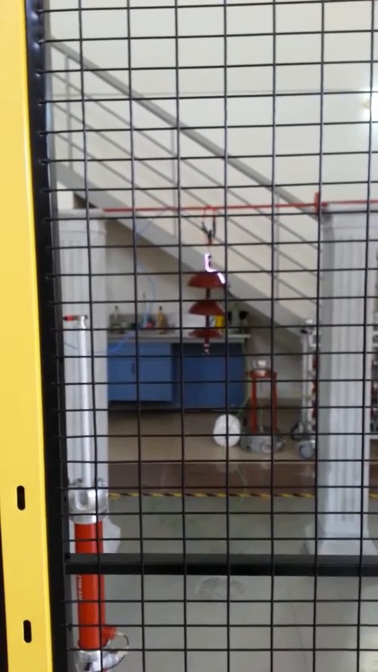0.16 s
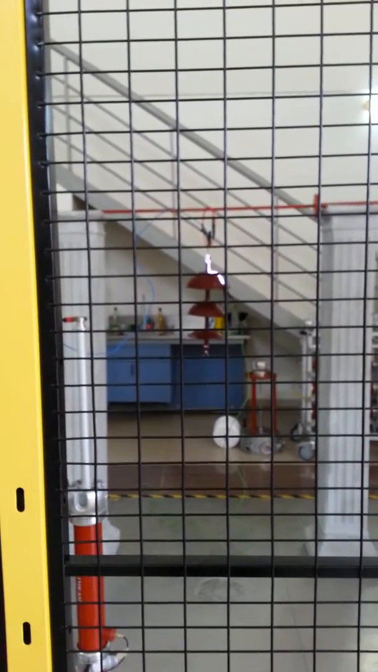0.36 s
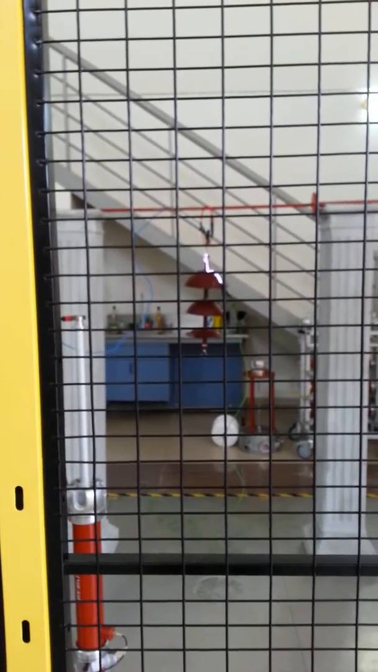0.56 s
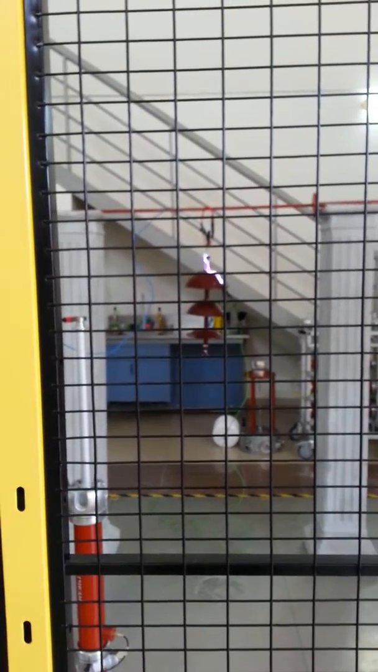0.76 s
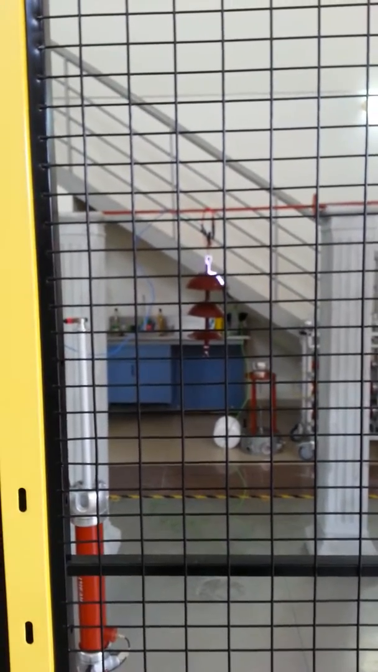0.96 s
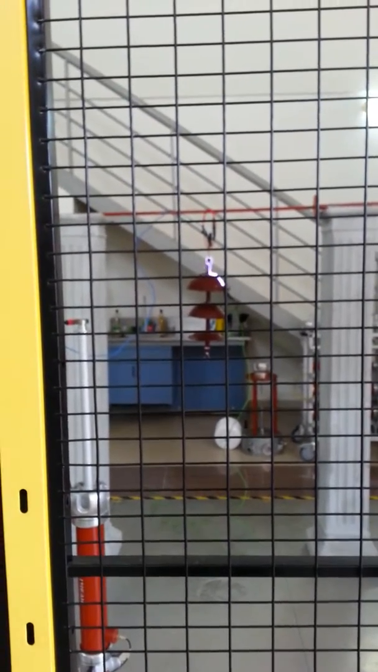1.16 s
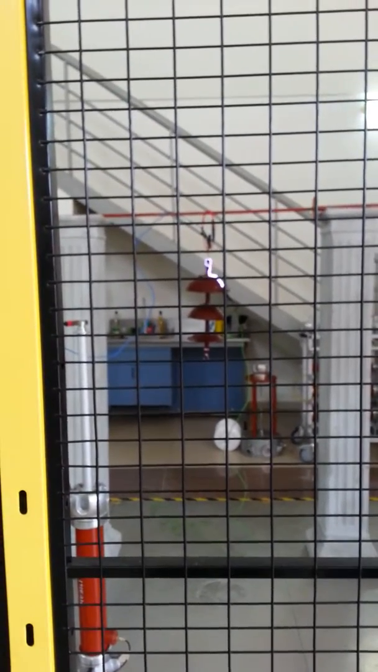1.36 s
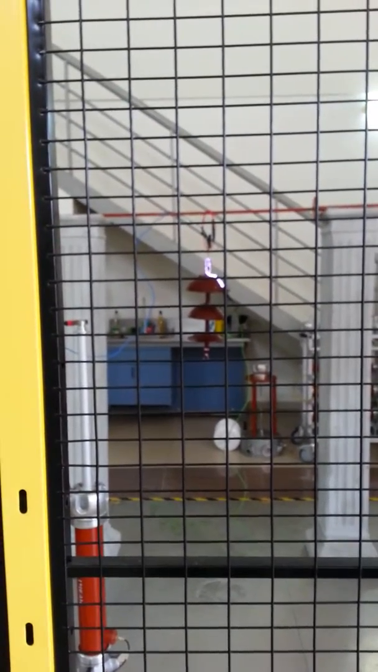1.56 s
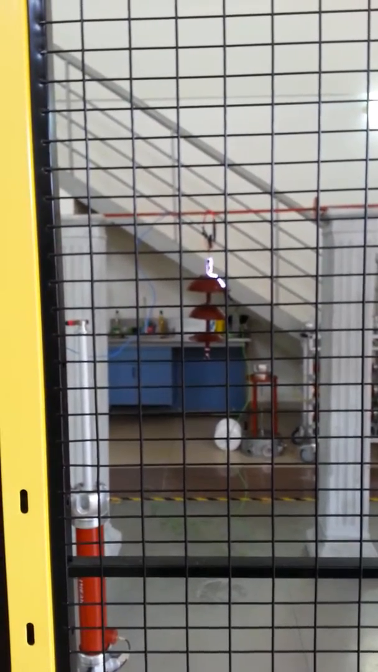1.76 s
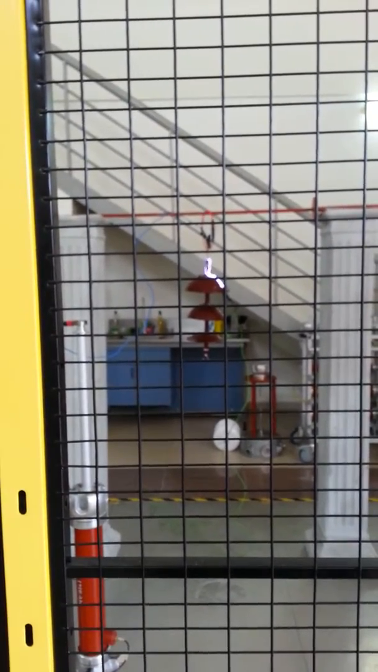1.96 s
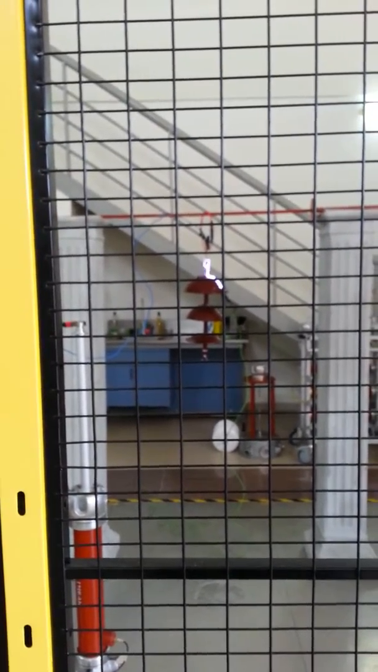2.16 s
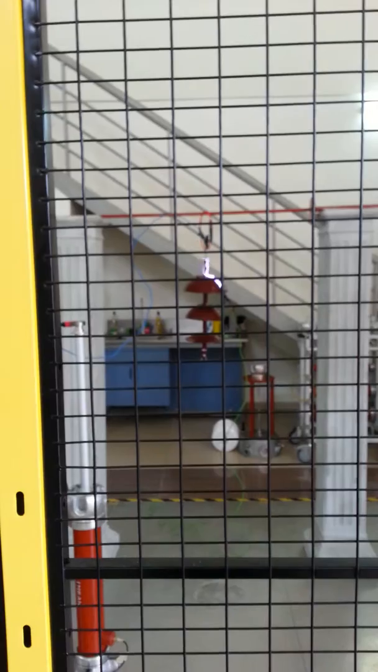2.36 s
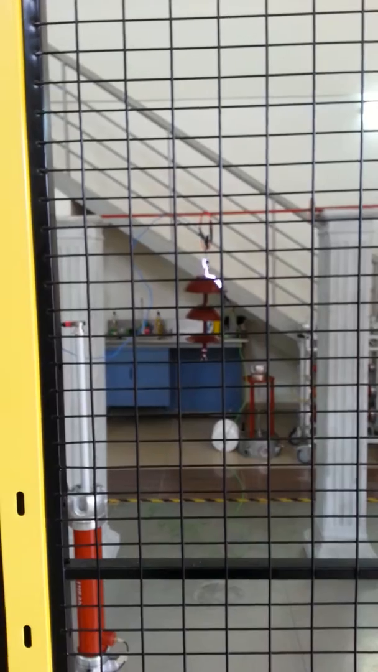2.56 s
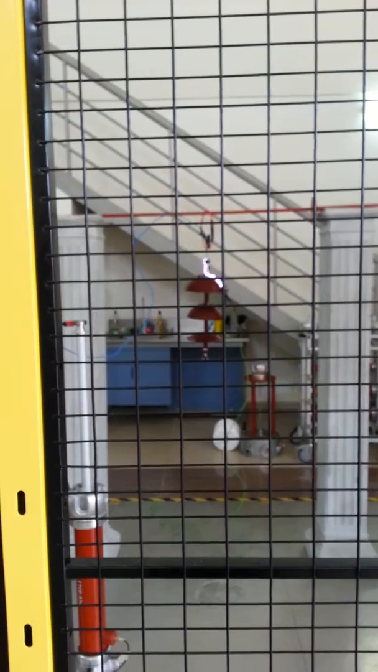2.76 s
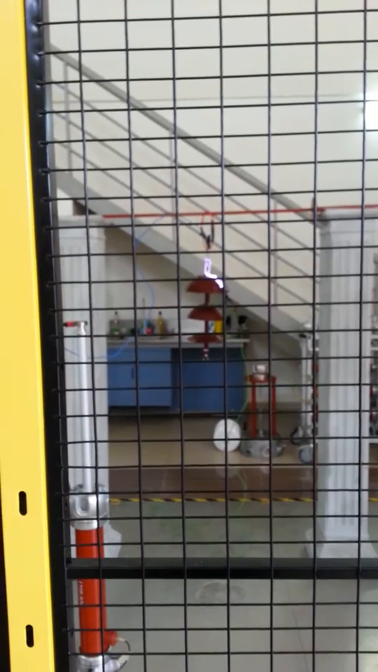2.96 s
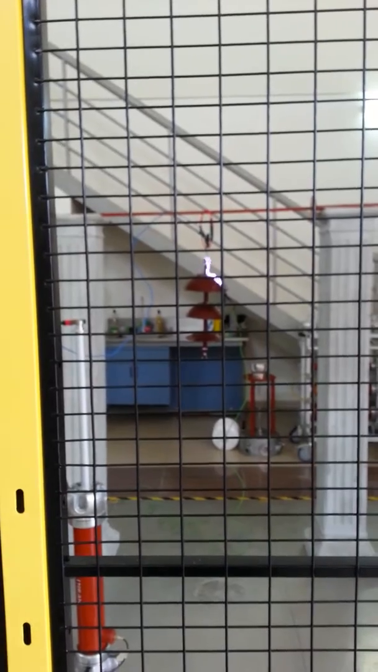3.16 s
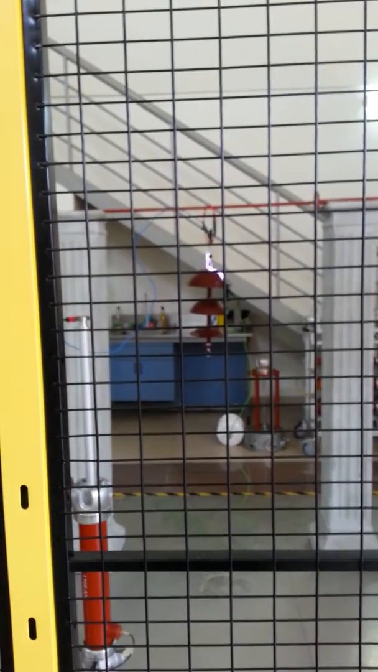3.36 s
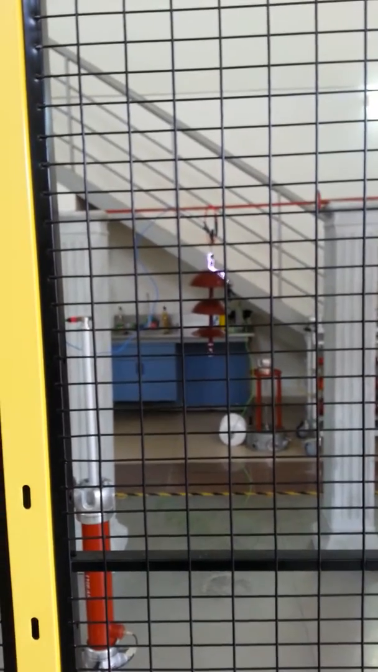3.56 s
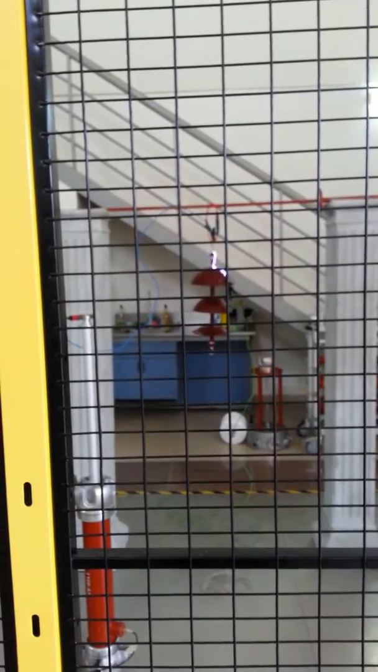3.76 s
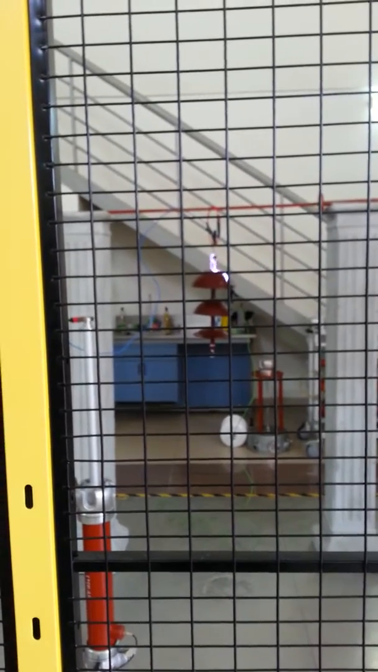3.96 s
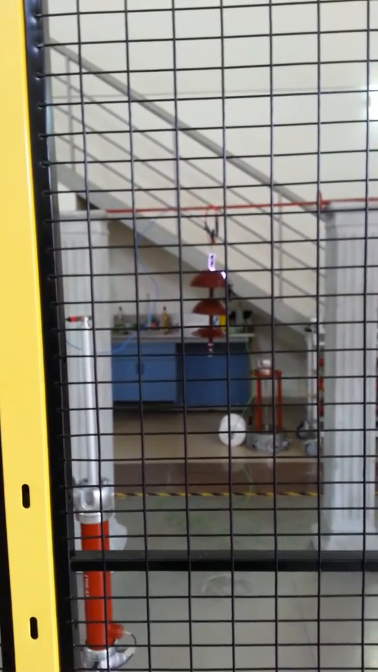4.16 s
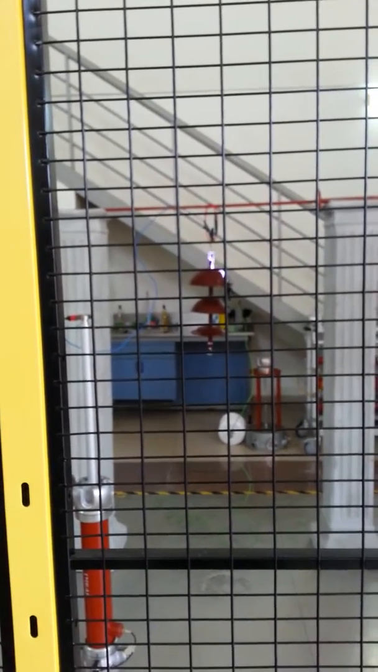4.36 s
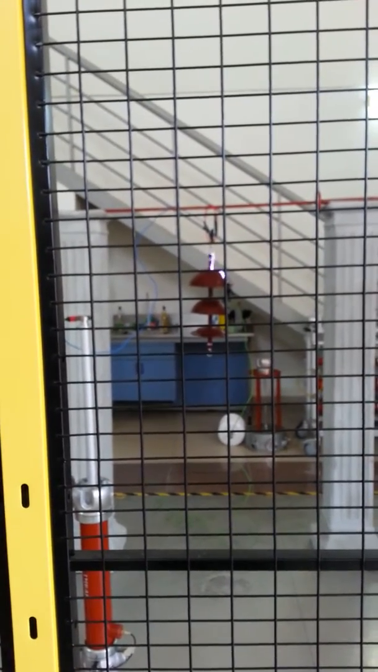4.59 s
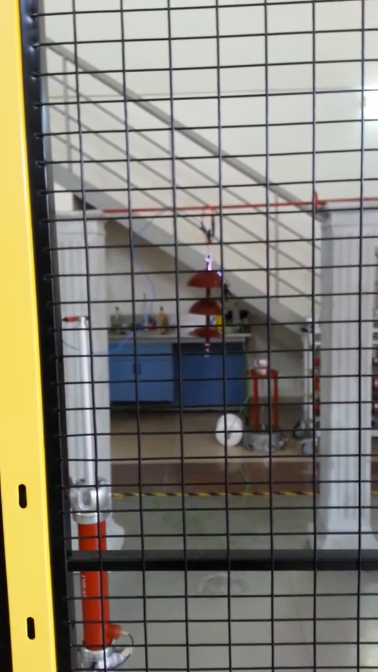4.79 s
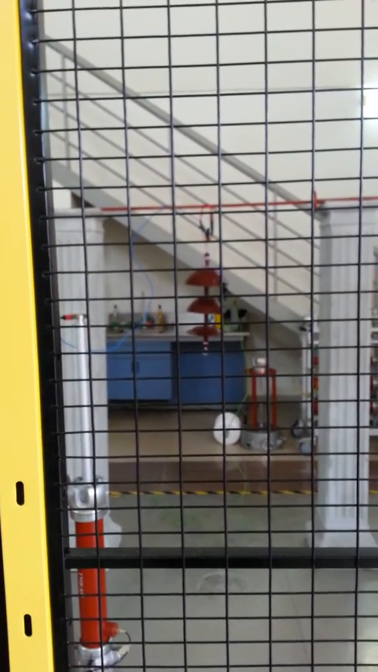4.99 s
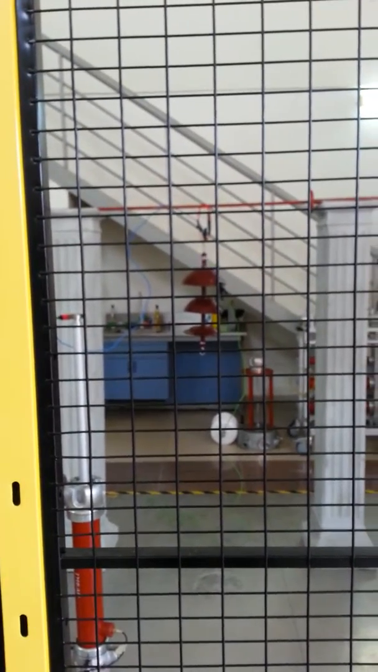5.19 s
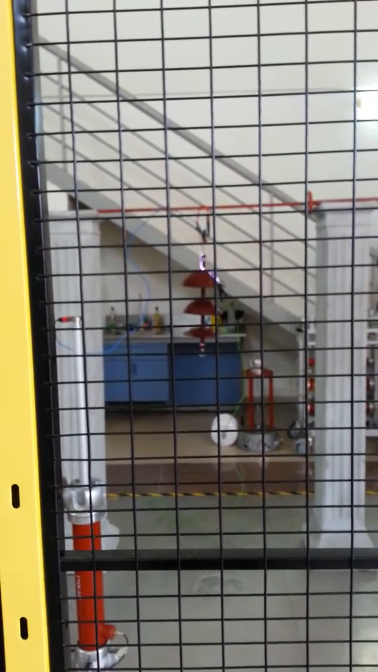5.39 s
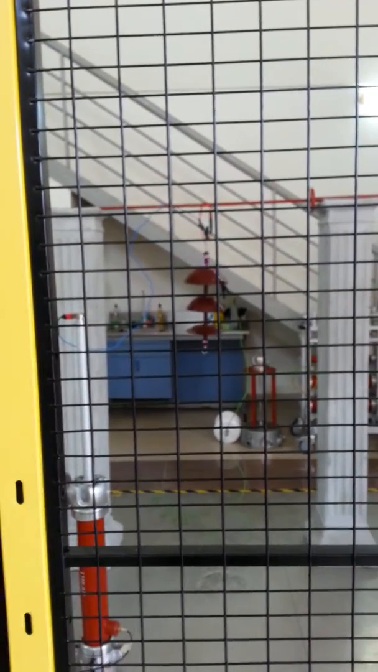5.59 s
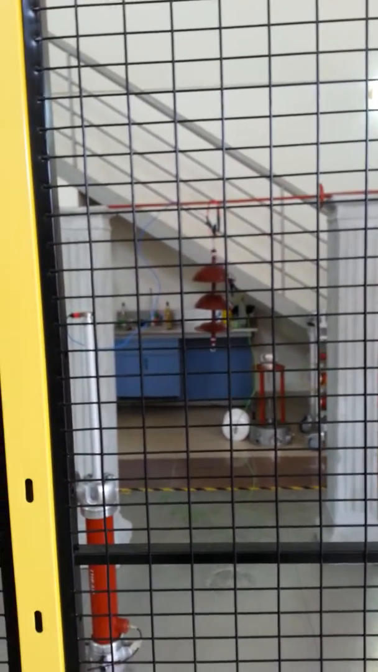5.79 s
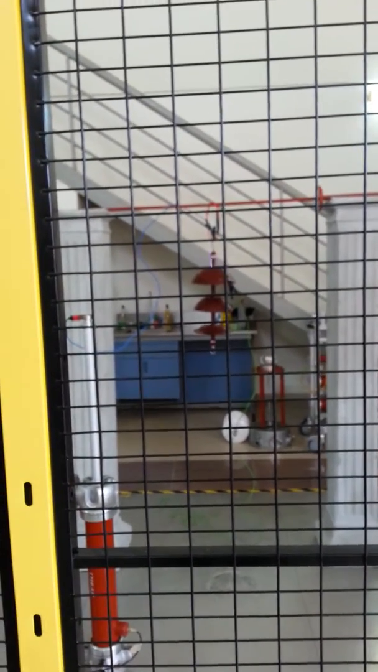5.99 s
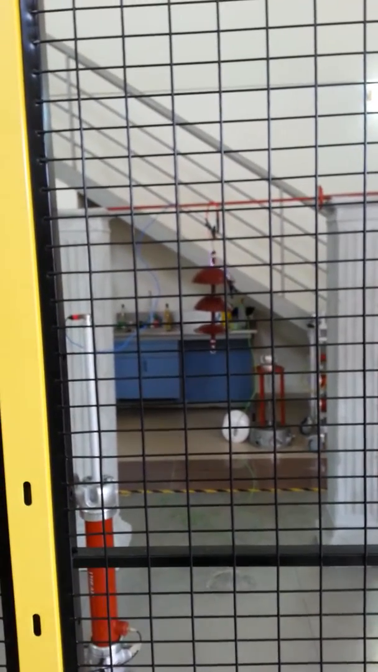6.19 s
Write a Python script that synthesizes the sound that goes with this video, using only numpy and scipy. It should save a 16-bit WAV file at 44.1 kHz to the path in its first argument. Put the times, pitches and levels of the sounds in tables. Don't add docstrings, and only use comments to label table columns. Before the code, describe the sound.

A loud, bright electrical sizzle fills a hard-walled test hall, dense as frying static with a fine hundred-per-second flutter. Low, irregular knocks and buzzing jolts strike the phone's microphones, differently left and right. A harsh flare bursts just before four seconds. Near five seconds the hiss thins, two more violent flashovers overload the sound, and it ends in uneven, spitting sparks.

```python
import sys
import numpy as np
from scipy import signal
from scipy.fft import rfft, irfft
from scipy.io import wavfile
from scipy.ndimage import uniform_filter1d, map_coordinates

SR = 44100
rng = np.random.default_rng(int(sys.argv[2]) if len(sys.argv) > 2 else 0)


def voltage_ratio(level):
    return 10 ** (np.asarray(level, float) / 20)


def output_pcm(signal):
    pcm = np.clip(np.atleast_2d(signal).T, -1, 1) * 32767
    wavfile.write(sys.argv[1], SR, np.round(pcm).astype(np.int16))


N = 274743
TIME = np.arange(N) / SR
HALF_CYCLE_S, FIRST_CREST_S = 1 / 100.05, 0.0068


def unit(x):
    return x / np.sqrt(np.mean(x ** 2, axis=-1, keepdims=True) + 1e-20)


def along(points, hz):
    f, v = np.transpose(points)
    return np.interp(np.log(hz + 1), np.log(f + 1), v)


def curves(rows, at_s):
    s, *cols = np.transpose(rows)
    return [np.interp(at_s, s, c) for c in cols]


def wobble(rate_hz):
    knots = rng.standard_normal(int(N * rate_hz / SR) + 4)
    return map_coordinates(knots, [TIME * rate_hz])


def impulses(s, size):
    at = np.clip(np.round(s * SR).astype(int), 0, N - 1)
    return np.bincount(at, size, N)


def through(x, kernel):
    return signal.fftconvolve(x, kernel)[:N]


def band(x, hz, kind):
    sos = signal.butter(2, hz, kind, fs=SR, output="sos")
    return signal.sosfiltfilt(sos, x, padtype="even")


def squash(x, top, knee):
    return x / (1 + abs(x / top) ** knee) ** (1 / knee)


def mains_crests():
    return np.arange(FIRST_CREST_S, N / SR, HALF_CYCLE_S)


# hz [Hz], density_db [dB per Hz]
LEFT_PORT = [(60, -20.5), (200, -11), (500, -13), (1000, -13.5), (2000, -13), (3500, -8.5), (5200, -0.5),
             (6300, 0.5), (7500, -3), (10000, -7.5), (14500, -10.5), (16000, -12.5)]
RIGHT_PORT = [(60, -19.5), (300, -21), (1500, -22), (3000, -20.5), (5000, -16.5), (6300, -7), (7000, -0.5),
              (7500, 0), (8300, -5.5), (10000, -12.5), (14500, -18.5), (16000, -20)]


def port(spectrum):
    log_gain = np.log(voltage_ratio(along(spectrum, np.fft.rfftfreq(4096, 1 / SR))))
    cepstrum = irfft(log_gain)
    cepstrum[1:2048] *= 2
    ring = irfft(np.exp(rfft(cepstrum[:2049], 4096)))
    return ring / np.linalg.norm(ring)


# hz [Hz], t60_s [s]
HALL = [(500, 0.41), (4000, 0.44), (12000, 0.17)]


def hall():
    hz, t, z = signal.stft(rng.standard_normal(SR // 2), SR, nperseg=256)
    decay = voltage_ratio(-60 * t / along(HALL, hz)[:, None])
    tail = signal.istft(z * decay, SR, nperseg=256)[1]
    return np.pad(tail / np.linalg.norm(tail), (90, 0))


def streamers(spread_s, scatter_db, count):
    draw = rng.random((count, 4))
    crest_s = FIRST_CREST_S + HALF_CYCLE_S * np.floor(draw[:, 0] * N / SR / HALF_CYCLE_S)
    s = crest_s + spread_s * (draw[:, 1] - 0.3)
    size = voltage_ratio(-scatter_db * np.log(draw[:, 2] + 0.0014))
    return unit(impulses(s, np.sign(draw[:, 3] - 0.5) * size))


# start_s [s], hiss_db [dB], lows_re_hiss_db [dB]
STEADY = [(0, -13.5, -19), (2.5, -13.5, -18.5), (4.85, -13.5, -19), (5.1, -16, -17), (5.2, -15, -19),
          (5.44, -17.5, -15.5), (5.57, -16, -15.5), (5.64, -17.5, -14), (5.72, -17, -17),
          (5.865, -15.5, -16), (6.0, -20.5, -19), (6.06, -15.5, -16), (6.16, -19.5, -17),
          (6.23, -17, -14.5)]
LAPSE_DULLS = 0.08


def hiss():
    level_db, low_db = curves(STEADY, TIME)
    surge_db, lapse_db = surge(), lapses()
    sputter = np.clip((TIME - 4.7) / 0.82, 0, 1)

    flicker_db = (0.31 + 0.5 * sputter) * wobble(30) + 0.36 * wobble(7.8)
    half_cycle = ((TIME - FIRST_CREST_S + 0.0032) / HALF_CYCLE_S + 1).astype(int)
    strike = rng.standard_normal(half_cycle[-1] + 1)[half_cycle]
    flicker_db += (0.25 + 0.43 * sputter) * strike

    dull_db = low_db + 19.5 - LAPSE_DULLS * lapse_db
    low_gain = voltage_ratio(dull_db + 0.2 * surge_db) - 1
    high_gain = voltage_ratio(-0.6 * dull_db + 0.34 * surge_db) - 1
    pops = streamers(spread_s=0.006, scatter_db=2.5, count=9000)
    out = []
    for spectrum in (LEFT_PORT, RIGHT_PORT):
        near = np.roll(pops, rng.integers(5, 60)) * voltage_ratio(-10 + 7 * sputter)
        wash = rng.standard_normal(N)
        wash = unit(wash + voltage_ratio(-11) * through(wash, hall()))
        air = through(unit(near + wash), port(spectrum))
        air = unit(squash(air, top=1.65 + 1.2 * sputter, knee=4.4))
        air += low_gain * band(air, 3600, "low") + high_gain * band(air, 7500, "high")
        out.append(voltage_ratio(3.1) * band(air, 60, "high"))
    return np.array(out) * voltage_ratio(level_db + lapse_db + flicker_db + surge_db)


def jolt_shape(rise_s, fall_s, blocker_hz, damping, corner_hz):
    t = np.arange(4096) / SR
    kick = np.where(t < rise_s, np.sin(np.pi / 2 * t / rise_s) ** 2, np.exp(-(t - rise_s) / fall_s))
    jf = 1j * np.fft.rfftfreq(4096, 1 / SR)
    blocker = jf ** 2 / (jf ** 2 + damping * blocker_hz * jf + blocker_hz ** 2)
    shape = irfft(rfft(kick) * blocker * jf / (jf + corner_hz))
    return shape / shape.max()


# start_s [s], left_share, right_share [of half-cycles]
BUZZ = [
    (0, .13, .58),
    (4.6, .13, .56),
    (4.75, .1, .3),
    (4.95, .05, .3),
    (5.0, 0, 0),
]
# start_s [s], peak_db [dB], polarity [+1/-1]
LEFT_JOLTS = [(0.3069, -13, 1), (0.426, -13.5, 1), (0.8068, -9, 1), (0.8379, -12, -1), (0.9574, -10, 1),
              (0.9675, -18, -1), (1.0868, -14, 1), (1.687, -9.5, 1), (1.747, -20, -1), (2.227, -16, 1),
              (2.2362, -7.5, -1), (2.3064, -17, 1), (2.327, -9, 1), (2.3364, -14, -1), (2.357, -13.5, -1),
              (2.6268, -11.5, 1), (3.2867, -15, 1), (3.6636, -18, 1), (3.7463, -1.5, 1), (3.7657, -8.5, -1),
              (3.9952, -9.5, 1), (4.0947, -9, 1), (4.7352, -9, 1), (4.7955, -15, -1), (5.768, -21, -1),
              (5.779, -19, -1), (5.9259, -26, 1), (6.0716, -26, 1), (6.1328, -26, 1)]
RIGHT_JOLTS = [(0.3069, -12, -1), (0.6363, -10, -1), (0.6767, -10, -1), (0.7166, -8, -1),
               (1.0162, -8.5, -1), (1.0668, -10.5, 1), (1.6068, -12.5, -1), (2.575, -11, -1),
               (2.87, -10, 1), (3.7655, -8, -1), (3.7759, -10, 1), (4.1356, -9.5, -1), (4.197, -9.5, -1),
               (4.6255, -9, -1), (4.665, -8, -1), (4.7954, -8, 1), (4.8144, -9, -1), (4.894, -10, -1),
               (4.904, -8, 1), (4.994, -10, 1), (5.1046, -7.5, -1), (5.1562, 1, 1), (5.177, -3, -1),
               (5.2141, -16, 1), (5.374, -11.5, -1), (5.7545, 2.5, -1), (5.7656, -13, 1), (5.8135, -8, 1),
               (6.0341, -15.5, -1), (6.0728, -17.5, 1)]


def jolts():
    crests = mains_crests()
    shape = jolt_shape(rise_s=0.00094, fall_s=0.0012, blocker_hz=45.5, damping=1.34, corner_hz=107.5)
    weakest_db, range_db = (-23.5, -18.5), (9, 9.5)
    out = []
    for table, share, floor_db, span_db in zip(
            (LEFT_JOLTS, RIGHT_JOLTS), curves(BUZZ, crests), weakest_db, range_db):
        s, peak_db, sign = np.transpose(table)
        draw = rng.random((len(crests), 4))
        clear = abs(crests[:, None] - s).min(1) > 0.004
        fires = (draw[:, 0] < share) & clear
        turn = (-1) ** np.cumsum(fires & (draw[:, 1] < 0.8))
        weak_s = crests - 0.0008 + 0.0019 * (draw[:, 2] - 0.5)
        weak = impulses(weak_s, fires * turn * voltage_ratio(floor_db + span_db * draw[:, 3]))
        strong = impulses(s - 0.00075, np.sign(sign) * voltage_ratio(peak_db + 1.0))
        out.append(through(weak + strong, shape))
    return np.array(out)


# start_s [s], surge_db [dB], length_s [s]
SURGES = [
    (3.7458, 6.5, 0.031),
    (5.153, 8.5, 0.028),
    (5.7535, 8, 0.025),
]


def surge():
    total_db = np.zeros(N)
    for s, db, length in SURGES:
        after_s = TIME - s - length
        hold = (TIME > s) / (1 + np.exp(np.clip(after_s / 0.0029, -50, 50)))
        total_db += db * hold - 1.3 * np.exp(-((after_s - 0.025) / 0.016) ** 2)
    return total_db


# start_s [s], left_peak_db, right_peak_db [dB]
SPARKS = [(3.7645, 2, 5), (4.965, 2, 0), (4.9667, -2, -6), (5.1131, -6, -4), (5.2138, -3, -3),
          (5.3731, 1, -2), (5.4112, 2, -4), (5.453, -1, -2), (5.4772, -5, -3), (5.5037, -5, -7),
          (5.5507, -8, -12), (5.606, -5, -3), (5.624, -4, -12), (5.6528, -4, -12), (5.6658, -9, -4),
          (5.7537, 4, 11), (5.7775, 0, 0), (5.913, -9, -11), (5.926, -3, -4), (5.9528, 0, -3),
          (5.9641, -1, -3), (5.9732, -4, -6), (5.9861, -4, -14), (6.0078, -14, -4), (6.0332, 0, -5),
          (6.073, -0.5, 3), (6.103, -13, -11), (6.1332, 3, -3), (6.1461, -4, -7), (6.1863, -9, -13)]


def sparks():
    s, *peaks_db = np.r_[SPARKS, faint_sparks()].T
    draw = rng.standard_normal((len(s), 2))
    second_s = s - 0.0001 + 0.00006 * abs(draw[:, 1])
    out = []
    for peak_db, spectrum in zip(peaks_db, (LEFT_PORT, RIGHT_PORT)):
        size = voltage_ratio(peak_db + 4.0) * np.sign(draw[:, 0] + 1)
        crack = impulses(s - 0.00015, size) - 0.26 * impulses(second_s, size)
        heard = through(crack + voltage_ratio(-9) * through(crack, hall()), port(spectrum))
        push = voltage_ratio(5.5) * band(crack, 1200, "low")
        out.append(heard + push)
    return np.array(out)


# start_s [s], depth_db [dB], length_s [s]
LAPSES = [(4.925, 1, .02), (5.047, 2, 0.013), (5.188, 1.5, 0.017), (5.36, 2.5, 0.043), (5.457, 5, 0.038),
          (5.52, 3.5, .02), (5.585, 5.5, 0.037), (5.618, 1.5, 0.036), (5.651, 8, 0.037),
          (5.785, 3.5, 0.055), (5.905, 5.5, 0.06), (6.028, 6.5, .023), (6.078, 7.5, 0.023),
          (6.11, 7, 0.024), (6.183, 3, .022), (6.222, 6.5, .02)]


def lapses():
    fade_s, relight_s = 0.0032, 0.0012
    total_db = np.zeros(N)
    for s, db, length in LAPSES:
        fade = (1 + np.tanh((TIME - s) / fade_s / 2)) / 2
        relight = (1 + np.tanh((s + length - TIME) / relight_s / 2)) / 2
        total_db -= db * fade * relight
    return total_db


# start_s [s], share [of half-cycles]
SPUTTER = [
    (5.0, .05),
    (5.4, .3),
    (5.7, .3),
    (5.8, .1),
    (5.92, .2),
    (5.98, 1),
    (6.05, .4),
    (6.23, .5),
]


def faint_sparks():
    level_db, scatter_db, stray_s = -11.5, 2, 0.003
    crests = mains_crests()
    chance, draw = rng.random(len(crests)), rng.standard_normal((len(crests), 3))
    rows = np.c_[crests + stray_s * draw[:, 0], level_db + scatter_db * draw[:, 1:]]
    return rows[(chance < curves(SPUTTER, crests)[0]) & (crests > SPUTTER[0][0])]


def scene():
    return hiss() + jolts() + sparks()


# hz [Hz], left_db, right_db [dB]
STARVED = [(101, 0, -10), (484, -3, -7), (1017, -2, -2.5), (3060, -4.5, -1.5), (6040, -12, -21),
           (14000, -2, -15)]


def dropouts(x, swing_db, depth_db):
    window = np.sin(np.pi * (np.arange(2048) + 0.5) / 2048)
    hz, _, z = signal.stft(np.pad(x, ((0, 0), (320, 0))), SR, window, nperseg=2048)
    power = (abs(z[:, :1024]) ** 2).reshape(2, 256, 4, -1).sum(2)
    share = uniform_filter1d(power / power.sum(1, keepdims=True), size=2)
    f, *margins = np.transpose(STARVED)
    margin_db = np.array([along(np.transpose([f, m]), hz[2:1024:4]) for m in margins])
    swing = swing_db * rng.standard_normal((2, 128, z.shape[2])).repeat(2, axis=1)
    usual = np.median(share, axis=2, keepdims=True)
    faint = share < usual * voltage_ratio(2 * (margin_db[..., None] + swing))
    z[:, :1024] *= voltage_ratio(-depth_db * faint.repeat(4, axis=1))
    return signal.istft(z, SR, window, nperseg=2048)[1][:, 320:N + 320]


def top_cut(x):
    return signal.sosfilt(signal.butter(12, 14500, fs=SR, output="sos"), x)


def record(dry):
    ceiling = 0.83 * voltage_ratio(0.054 * np.clip(surge(), 0, 9))
    limited = squash(dry, top=ceiling, knee=7.4)
    mix = dropouts(limited, swing_db=2.5, depth_db=20)
    return top_cut(mix)


dry = scene()
out = record(dry)
output_pcm(out)
```